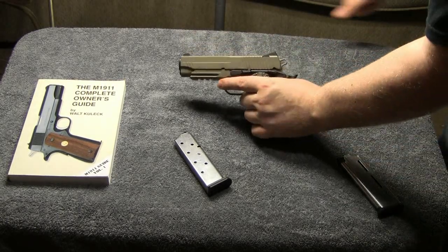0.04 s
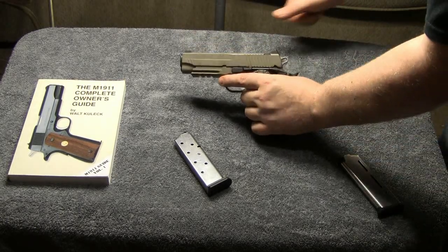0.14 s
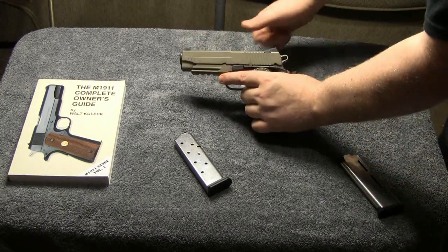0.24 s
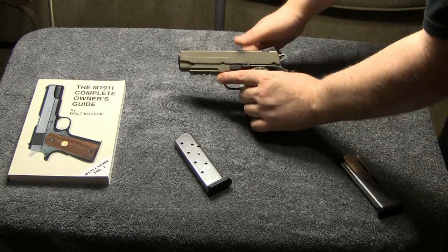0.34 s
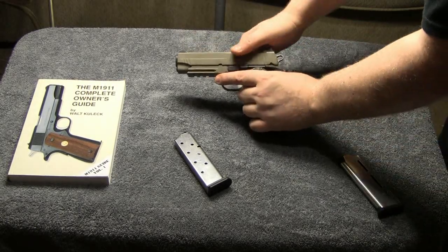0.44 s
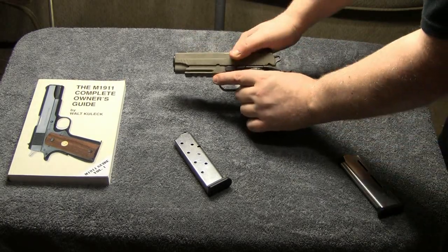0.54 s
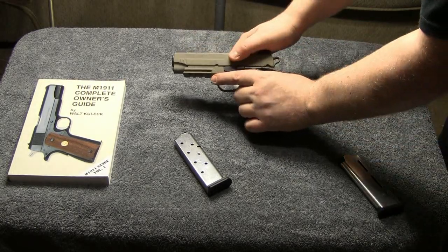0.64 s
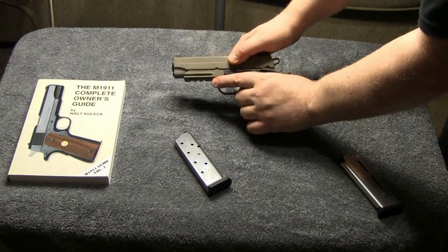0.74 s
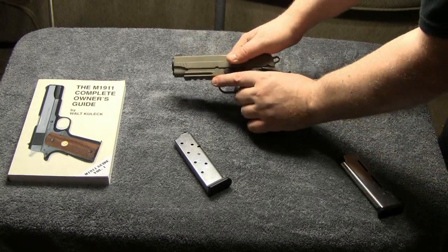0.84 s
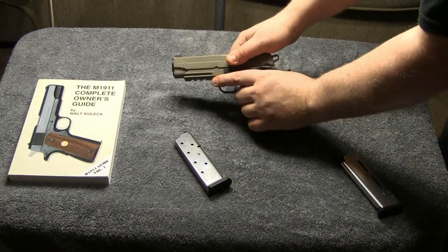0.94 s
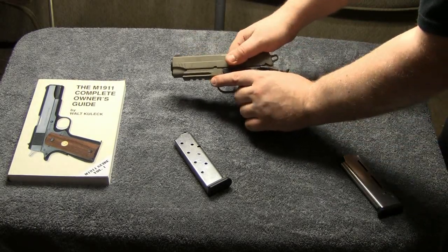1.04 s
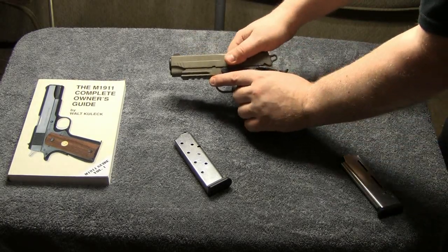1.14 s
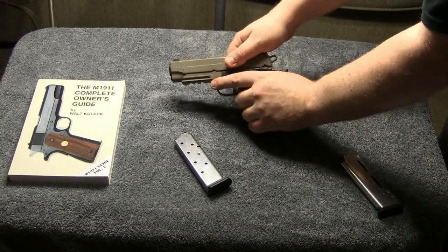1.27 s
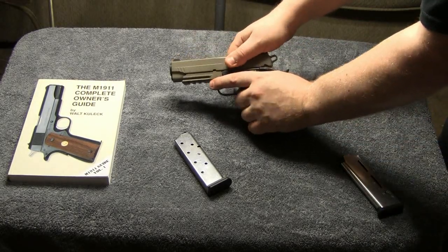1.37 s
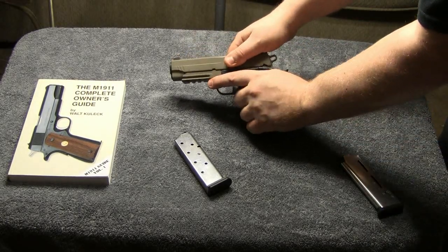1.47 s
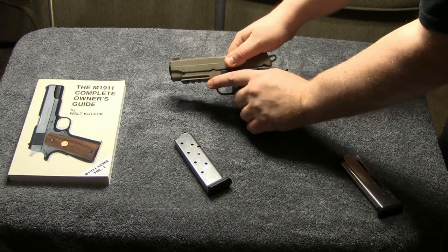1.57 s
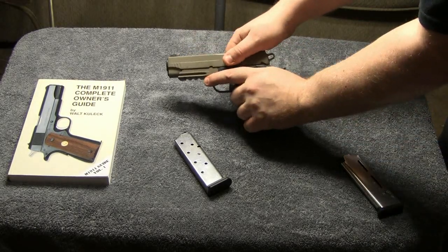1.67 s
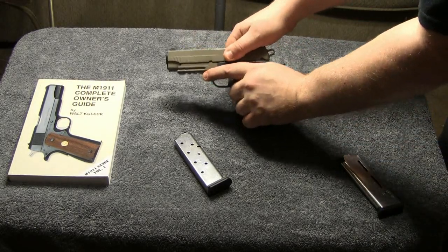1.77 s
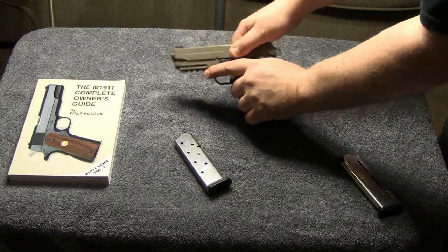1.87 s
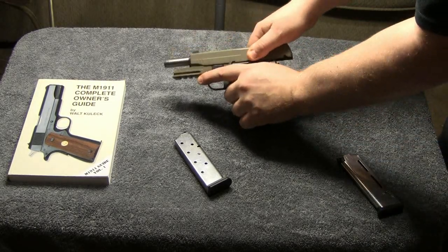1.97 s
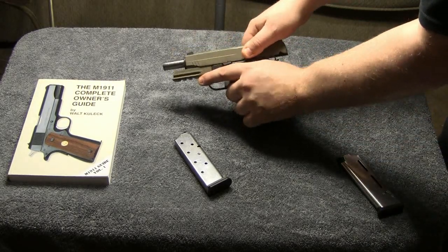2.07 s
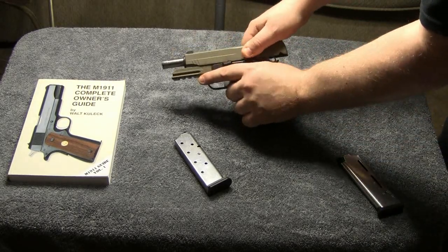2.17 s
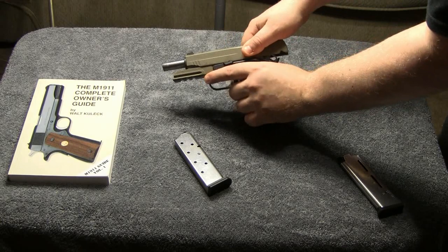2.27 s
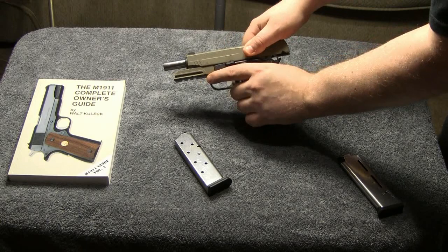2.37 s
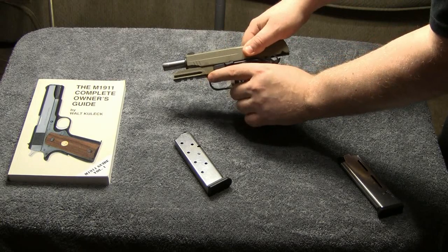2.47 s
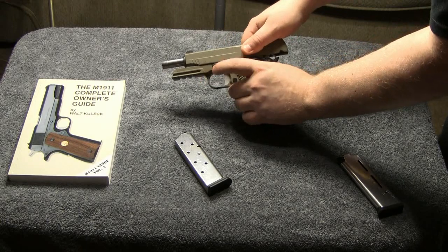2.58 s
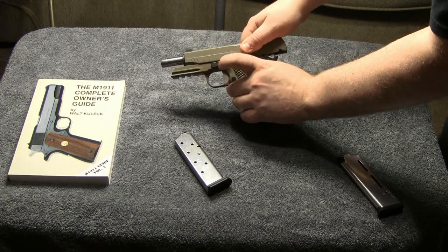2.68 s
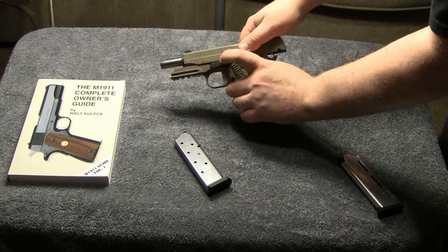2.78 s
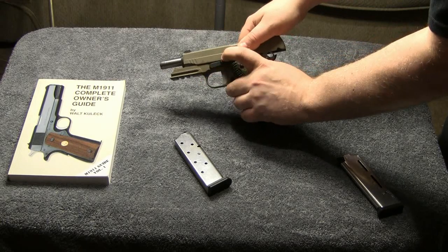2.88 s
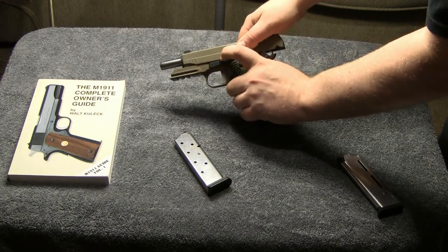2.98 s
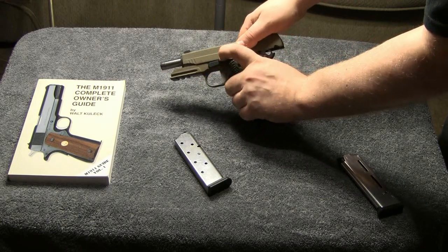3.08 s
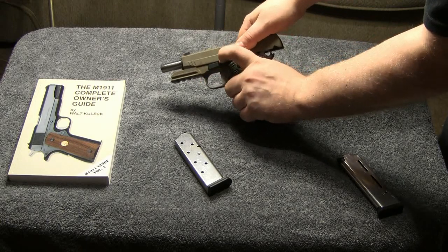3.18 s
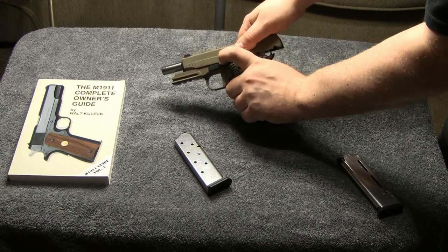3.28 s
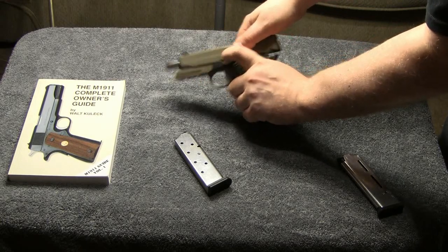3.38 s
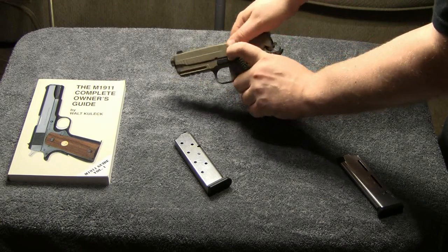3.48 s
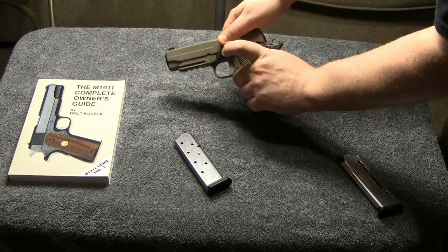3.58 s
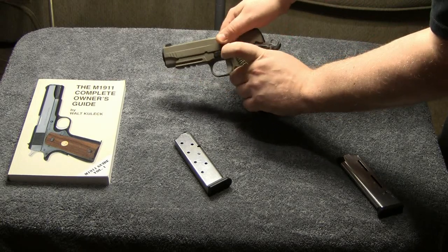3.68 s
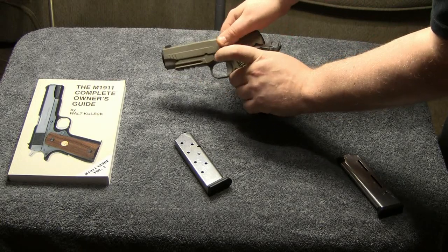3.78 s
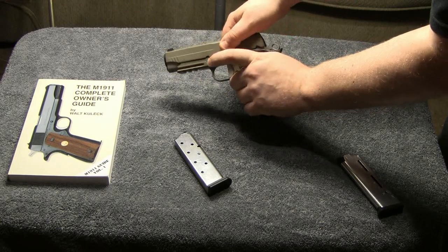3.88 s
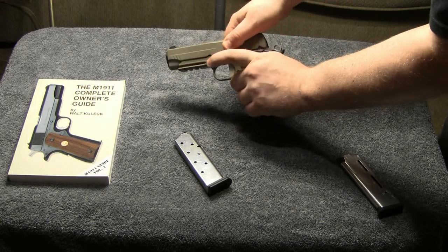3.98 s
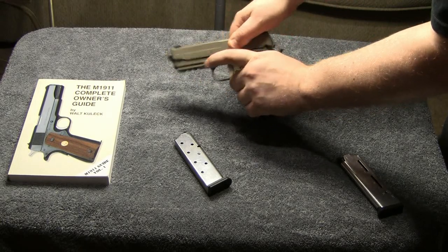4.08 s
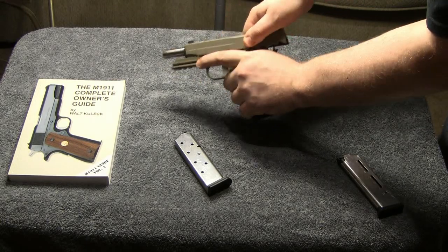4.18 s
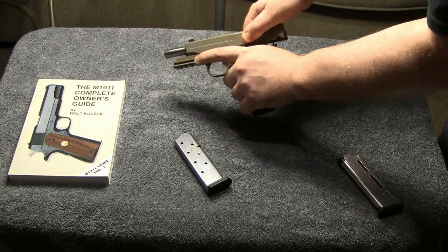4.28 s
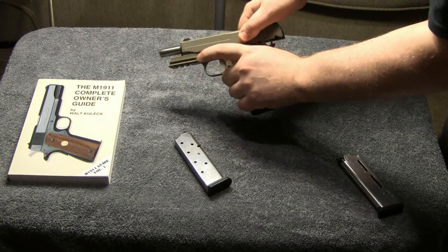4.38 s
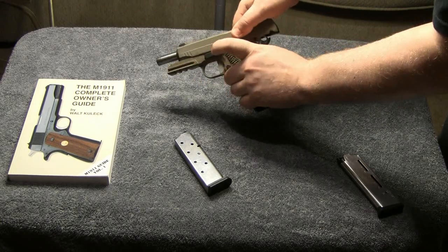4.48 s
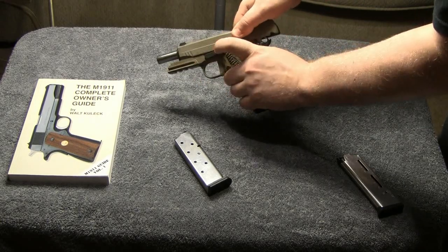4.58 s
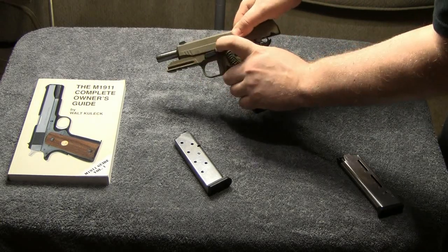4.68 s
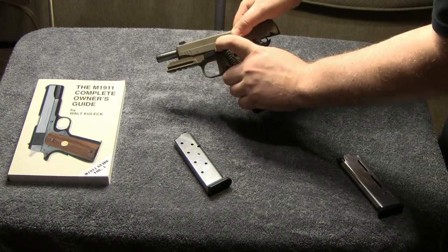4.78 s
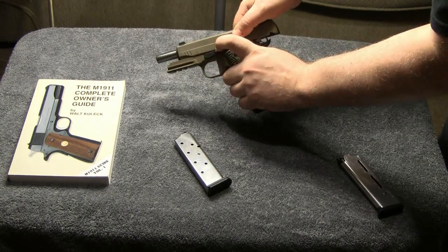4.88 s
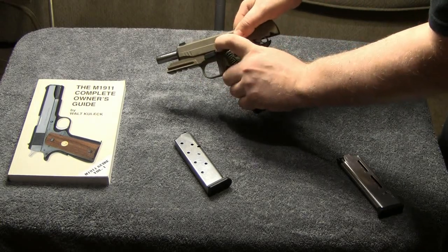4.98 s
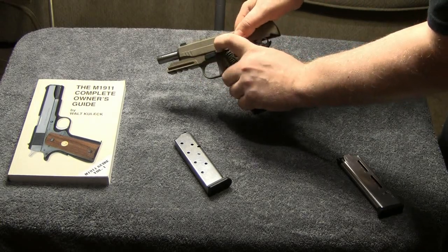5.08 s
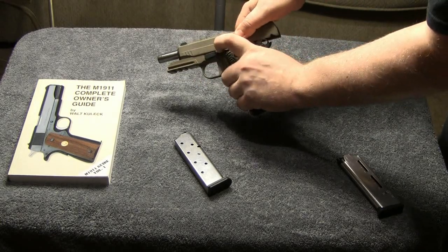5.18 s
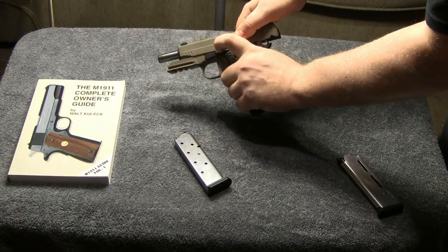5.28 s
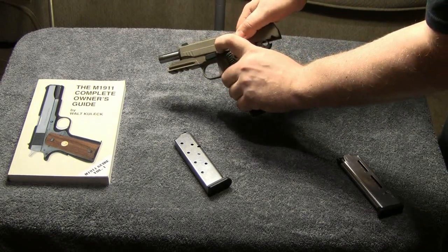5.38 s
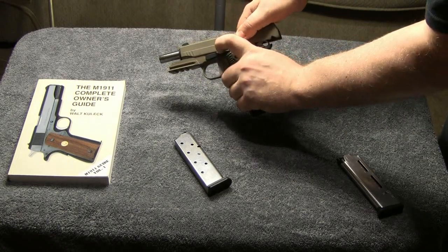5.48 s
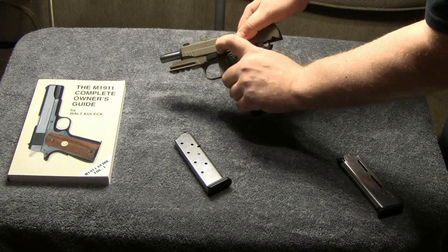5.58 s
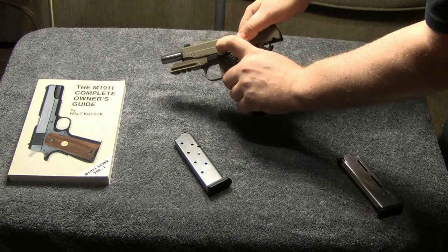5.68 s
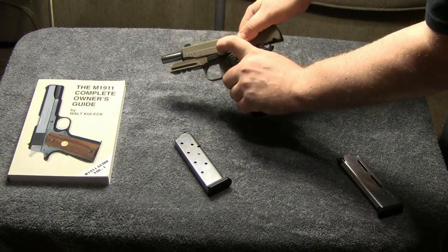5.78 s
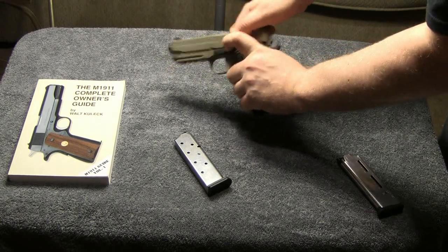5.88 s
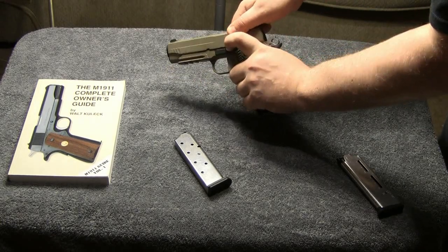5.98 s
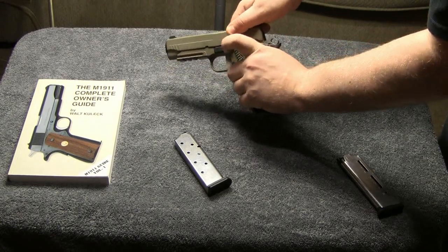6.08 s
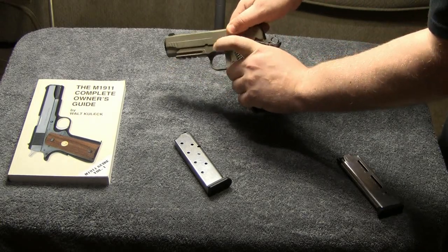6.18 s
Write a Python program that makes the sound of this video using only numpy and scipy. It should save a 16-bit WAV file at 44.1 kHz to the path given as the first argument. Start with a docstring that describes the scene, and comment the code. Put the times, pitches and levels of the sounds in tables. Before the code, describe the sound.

A pistol's slide is pulled back and run forward twice by hand, with sharp steel clacks and brief scrapes in a small room.

```python
"""Sharp steel clacks in a small room: a pistol is worked by hand over a cloth-covered table, its slide
pulled back, locked, then run forward and home. Each contact is a short dense crack with a faint ring;
the rails scrape between contacts and hands rustle on the grip. The room answers briefly over a low
hum and hiss, and a limiter catches the hardest blows."""
import sys
import numpy as np
from scipy import signal
from scipy.fft import rfft, irfft, next_fast_len
from scipy.io import wavfile
from scipy.ndimage import uniform_filter1d, minimum_filter1d, map_coordinates

SR = 44100
rng = np.random.default_rng(int(sys.argv[2]) if len(sys.argv) > 2 else 0)


def transcribe(u):
    """Save the signal u as a 16-bit wav file named by the first command-line argument.

    u: samples, shape (n,) or (channels, n), limited to [-1, 1]; the rate is SR.
    q: integer samples, one column per channel.
    """
    v = np.clip(np.atleast_2d(u).T, -1, 1)
    q = np.round(v * 32767).astype(np.int16)
    wavfile.write(sys.argv[1], SR, q)


N = 275007

# Stereo image of the room and the hands. Each row: frequency in Hz, left-right correlation.
ROOM_CORRELATION = [(300, 0.93), (1200, 0.98), (3500, 0.89), (6000, 0.33), (9000, 0.091)]


def amp(db):
    return 10 ** (np.asarray(db) / 20)


def unit(x):
    return x / np.sqrt(np.mean(x ** 2) + 1e-20)


def along(points, hz):
    """Read a curve of (Hz, value) points on a log frequency axis."""
    point_hz, values = np.transpose(points)
    return np.interp(np.log(hz + 1), np.log(point_hz + 1), values)


def bump(hz, centre_hz, width_hz, db):
    """Gain of one resonance standing db above its surroundings."""
    return amp(db / (1 + (2 * (hz - centre_hz) / width_hz) ** 2))


def wobble(rate):
    """A smooth random curve, rate knots a second."""
    return map_coordinates(rng.standard_normal(int(N * rate / SR) + 4), [np.arange(N) * rate / SR])


def filtered(x, response):
    """Shape x by a response over frequency."""
    n = x.shape[-1]
    m = next_fast_len(n + 8192)
    return irfft(rfft(x, m) * response(np.fft.rfftfreq(m, 1 / SR)), m)[..., :n]


def resonate(x, gain):
    """Pass x through the causal filter that has this gain over frequency."""
    m = 2 * next_fast_len(len(x))
    cepstrum = irfft(np.log(gain(np.fft.rfftfreq(m, 1 / SR)) + 1e-9), m)
    cepstrum[1:m // 2] *= 2
    cepstrum[m // 2 + 1:] = 0
    return irfft(rfft(x, m) * np.exp(rfft(cepstrum)), m)[:len(x)]


def noise(spectrum, size):
    """Coloured noise of rms 1."""
    return unit(filtered(rng.standard_normal(size), lambda hz: amp(along(spectrum, hz))))


def stereo_noise(spectrum, correlation, size):
    """Coloured noise whose stereo width changes with frequency."""
    def mid_side_gains(hz):
        angle = np.arccos(np.clip(along(correlation, hz), -1, 1)) / 2
        return np.array([np.cos(angle), np.sin(angle)])

    mid, side = filtered(noise(spectrum, (2, size)), mid_side_gains)
    return unit(np.array([mid + side, mid - side]))


def add(track, s, sound):
    """Mix a sound into the track from time s."""
    part = track[..., max(round(s * SR), 0):][..., :sound.shape[-1]]
    part += sound[..., :part.shape[-1]]


def room_air(t, start_db=-52.5, sink_db_per_s=0.4353):
    """Slowly sinking air and hiss, with faint whistles on top."""
    # Colour of the air. Each row: frequency in Hz, spectral density in dB.
    colour = [(20, -33.5), (60, -19), (130, -15), (200, -10.5), (250, -7), (340, -6), (550, -8),
              (1000, -11.5), (2400, -22), (5000, -31.5), (7500, -32), (9000, -29.5), (14300, -38.5),
              (16000, -59.5)]
    # Its stereo image. Each row: frequency in Hz, left-right correlation.
    correlation = [(60, 0.32), (150, 0.58), (380, -0.44), (950, -0.57), (2380, -0.025), (5980, 0.12),
                   (15000, -0.86)]
    # Narrow bands in the hiss. Each row: centre in Hz, width in Hz, boost in dB.
    whistles = [(6300, 260, 8), (7630, 430, 6), (8000, 250, 5.5)]
    air = stereo_noise(colour, correlation, N)
    air = filtered(air, lambda hz: np.prod([bump(hz, *band) for band in whistles], axis=0))
    return amp(start_db - sink_db_per_s * t) * air


def hum_and_fan(t, hum_hz=100, rest_db=-73, swell_db=10.5, fade_s=.07, sink_db_per_s=.5,
                fan_hz=238, fan_db=-67, fan_follows=.25):
    """A low hum swells and falls back; a wavering fan tone gently follows its level."""
    # Swells of the hum. Each row: start in seconds, end in seconds.
    swells = [(-0.05, .36), (.79, 1.44), (1.72, 1.96)]
    swell = sum(np.clip(.5 + np.minimum(t - start, end - t) / fade_s, 0, 1) for start, end in swells)
    hum_db = rest_db - sink_db_per_s * t + swell_db * swell
    hum = amp(hum_db + .5 * wobble(10)) * unit(np.sin(2 * np.pi * hum_hz * t + .4 * wobble(12)))
    fan = [amp(2.5 * wobble(6)) * np.sin(2 * np.pi * fan_hz * t + wobble(12)) for _ in range(2)]
    return hum + amp(fan_db + fan_follows * (hum_db - hum_db.mean())) * unit(np.array(fan))


def in_room(sound, room_db=-7, gap_s=0.0037, build_s=.002, early_db=2, early_t60=0.16):
    """The direct sound, then strong near walls and a short diffuse tail."""
    # Colour of the reverb. Each row: frequency in Hz, level in dB.
    colour = [(100, -12), (600, 3.5), (1500, 1.5), (3000, 2.5), (6000, -1.5), (10500, 1.5), (13000, 4),
              (16000, -0.5)]
    # Decay of the room. Each row: frequency in Hz, T60 in seconds.
    decay = [(150, 0.64), (600, 0.27), (1500, 0.4), (3500, 0.27), (7000, 0.32), (10000, 0.23),
             (15000, 0.068)]
    hz, t, spectra = signal.stft(stereo_noise(colour, ROOM_CORRELATION, SR // 3), SR, nperseg=256)
    tail = signal.istft(spectra * amp(-60 * t / along(decay, hz)[:, None]), SR, nperseg=256)[1]
    t = np.arange(tail.shape[1]) / SR
    tail *= 1 - np.exp(-np.maximum(t - gap_s, 0) / build_s)
    tail *= np.hypot(1, amp(early_db - 60 * t / early_t60))  # near walls
    response = amp(room_db) * tail / np.linalg.norm(tail[0])
    response[:, 0] += 1  # direct sound
    return signal.fftconvolve(sound[None], response, axes=1)


def hands(t, grain_db=0.5, hollow_hz=650, hollow_width_hz=90, hollow_db=10):
    """Soft swells of skin sliding over the hollow grip."""
    # Shifts of the hands. Each row: centre in seconds, length in seconds, level in dB.
    rubs = [(0.28, 0.44, -66), (0.656, 0.54, -63.5), (1.597, 0.032, -53.5), (5.077, 0.062, -56),
            (5.202, 0.12, -56.5), (5.601, 0.43, -61)]
    # Colour of rubbing skin. Each row: frequency in Hz, spectral density in dB.
    skin = [(30, -35), (200, -1), (500, -8.5), (660, -7), (850, -3.5), (1500, -9), (2500, -10),
            (5000, -21.5), (10000, -43), (16000, -41.5)]
    swell = sum(amp(db) * np.exp(-(2 * (t - s) / length) ** 2) for s, length, db in rubs)
    rub = amp(grain_db * wobble(90)) * stereo_noise(skin, ROOM_CORRELATION, N)
    return swell * unit(filtered(rub, lambda hz: bump(hz, hollow_hz, hollow_width_hz, hollow_db)))


def thumps(push_s=0.00051, low_cut_hz=45):
    """The slide ends its travel and jolts the whole gun: one short low push of air."""
    # Each row: start in seconds, level in dB.
    jolts = [(2.012, -48), (4.245, -43), (5.976, -38)]
    track = np.zeros(N)
    age = np.arange(SR // 20) / SR / push_s
    for s, db in jolts:
        add(track, s, amp(db) * age * np.exp(1 - age))
    return filtered(track, lambda hz: hz ** 2 / (hz ** 2 + low_cut_hz ** 2))


def scrapes(grit_db=3.0, edge_s=0.0022, shelf_hz=4800):
    """The slide catches and slips on its rails and spring in tiny grains, duller running forward."""
    # Slide strokes. Each row: start in seconds, end in seconds, level in dB, treble shelf in dB.
    strokes = [(1.953, 2.016, -35.5, 0.5), (2.061, 2.132, -47.5, -8), (3.446, 3.476, -32.5, -4.5),
               (3.574, 3.592, -46, -7.5), (4.156, 4.208, -31, -2), (5.114, 5.143, -64, 5),
               (5.927, 5.98, -36, -2)]
    # Colour of the rails. Each row: frequency in Hz, spectral density in dB.
    rails = [(200, -24), (600, -3.5), (1400, -12.5), (3300, 0), (5200, -1.5), (7000, 4), (8500, -3),
             (10500, -1.5), (12500, -13), (16000, -28)]
    t = np.arange(SR // 12) / SR
    for start, end, level_db, treble_db in strokes:
        grit = amp(grit_db * unit(uniform_filter1d(rng.standard_normal(len(t)), size=50)))
        gate = np.clip(np.minimum(t, end - start - t) / edge_s, 0, 1)
        shelf = lambda hz: amp(treble_db * hz ** 4 / (hz ** 4 + shelf_hz ** 4))
        rasp = filtered(noise(rails, len(t)), shelf)
        yield start, amp(level_db) * gate * unit(grit * rasp)


def barrel_rings(t60=.21):
    """The bared barrel rings thinly when the slide hits its rear stop."""
    # Barrel modes. Each row: frequency in Hz, relative level in dB.
    modes = [(2440, 2.5), (5330, -7), (6480, -4.5), (7410, -5.5)]
    # Hits on the rear stop. Each row: start in seconds, level in dB.
    rear_stops = [(2.0136, -42.5), (4.2438, -40.5)]
    t = np.arange(SR // 3) / SR
    ring = sum(amp(db - 60 * t / t60) * np.sin(2 * np.pi * hz * t) for hz, db in modes)
    return [(s, amp(level_db) * ring) for s, level_db in rear_stops]


def burst(t60, chatter_db, attack_s=0.00014, chatter_t60=0.069, evenness=0.73):
    """A broadband snap that dies within milliseconds while loose parts chatter on; rms 1 at its head."""
    t = np.arange(SR // 8) / SR
    fall = np.hypot(amp(-60 * t / t60), amp(chatter_db - 60 * t / chatter_t60))
    spectrum = rfft(rng.standard_normal(len(t)) * fall, next_fast_len(2 * len(t)))
    spectrum /= (np.abs(spectrum) + 1e-9) ** evenness  # crowded steel modes leave no deep gaps
    snap = irfft(spectrum)[:len(t)] * (1 - np.exp(-t / attack_s))
    return snap / snap[t < .004].std()


def clack(level_db, knock_db, ping_db, t60, frame_hz, slide_hz, slide_db,
          frame_db=8, frame_width=0.35, slide_width=0.25, chatter_db=-22):
    """One contact: a crack through resonances that shift with the slide's position, and a faint ring."""
    # Colour of the crack. Each row: frequency in Hz, spectral density in dB.
    crack_colour = [(40, -33), (200, -27.5), (380, -10), (560, 0), (1300, -1), (1800, -1.5), (3300, 1.5),
                    (4400, 1.5), (5400, 0), (6800, 4), (8300, 0.5), (9800, 6.5), (11300, -0.5), (13000, -7),
                    (16000, -24)]
    # Modes of slide and frame. Each row: frequency in Hz, relative level in dB, T60 in seconds.
    steel_modes = [(630, -2, .14), (707, -5, .12), (877, -1, .14), (1370, -6, .11), (1490, -7, .12),
                   (2415, -7, .14), (2644, -5, .14), (3420, -3, .12), (3505, -3, .14), (4209, -3, .13),
                   (4769, -5, .12), (5320, -7, .13), (6060, -6, .15), (6450, -7, .13), (7420, -6, .13),
                   (7858, -7, .14), (9420, -3, .15), (9620, -3, .14), (11087, -8, .14)]
    knock_below_hz, ping_above_hz = 1800, 6500
    register = lambda hz: np.searchsorted([knock_below_hz, ping_above_hz], hz)
    gains = amp(level_db + np.array([knock_db, 0, ping_db]))  # heavy contacts knock, sharp edges ping

    def body(hz):
        """Resonant colour, each register at its own strength; a soft contact also loses its top."""
        frame = bump(hz, frame_hz, frame_width * frame_hz, frame_db)
        slide = bump(hz, slide_hz, slide_width * slide_hz, slide_db)
        colour = amp(along(crack_colour, hz)) * frame * slide
        register_rms = np.sqrt(np.bincount(register(hz), colour ** 2) / len(hz))
        softness = amp(min(ping_db, 0) * np.maximum(hz / 10000 - 1, 0))
        return colour * softness * uniform_filter1d((gains / register_rms)[register(hz)], size=200)

    crack = resonate(burst(t60, chatter_db), body)
    t = np.arange(len(crack)) / SR
    hz, mode_db, mode_t60 = np.transpose(steel_modes)
    ring_db = rng.normal(-17.5, 2.5, len(hz))
    strength = gains[register(hz)] * amp(ring_db + mode_db) * rng.choice([-1, 1], len(hz))
    partials = np.sin(2 * np.pi * hz[:, None] * t) * amp(-60 * t / mode_t60[:, None])
    return crack + strength @ partials


def ticks(t60=.013, frame_hz=1020, full_knock_db=-31, knock_growth=.45):
    """Loose parts click lightly under the fingers; the faintest clicks are mostly dull knock."""
    # Each row: start in seconds, level in dB, relative treble in dB, slide resonance in Hz.
    contacts = [(1.4375, -43.5, -3.5, 4250), (1.5912, -52.5, -8.5, 2670), (1.7234, -50.5, -16, 3400),
                (1.8102, -57, -6, 3400), (1.94, -47, -0.5, 3950), (2.1125, -34, -10.5, 2800),
                (3.069, -47.5, -9, 2750), (3.5781, -40.5, -4, 4520), (3.8526, -55.5, -16.5, 2900),
                (3.9348, -52, -6.5, 3240), (3.9911, -49.5, -6.5, 3200), (4.0463, -55.5, -13, 3500),
                (4.1482, -32.5, -11, 4540), (5.049, -53, -17, 2640), (6.1045, -39.5, -8, 3300),
                (6.1346, -40, -5, 3050), (6.2171, -45, -12, 2970)]
    for s, level_db, ping_db, slide_hz in contacts:
        knock_db = full_knock_db + knock_growth * level_db - level_db  # grows more slowly than the tick
        yield s, clack(level_db, knock_db, ping_db, t60, frame_hz, slide_hz, slide_db=14,
                       frame_db=12, frame_width=0.59, slide_width=0.3, chatter_db=-30.5)


def snaps(ping_db=3, full_t60=0.0074, full_db=-16, halving_db=6):
    """Parts snap brightly edge over edge as the slide is forced along: the stronger, the shorter."""
    # Each row: start in seconds, level in dB, relative knock in dB, frame and slide resonances in Hz.
    contacts = [(1.9576, -24.5, -15, 1400, 4750), (1.9649, -29, -14.5, 1170, 3650),
                (1.986, -19, -15, 610, 3550), (2.013, -17.5, -18.5, 610, 3430),
                (3.4491, -25, -8.5, 600, 3500), (4.1572, -18.5, -9.5, 787, 5870),
                (4.1817, -22, -10.5, 620, 4160), (4.245, -18, -14.5, 690, 4170),
                (5.9303, -26, -6, 664, 3020)]
    for s, level_db, knock_db, frame_hz, slide_hz in contacts:
        t60 = full_t60 * 2 ** ((full_db - level_db) / halving_db)
        yield s, clack(level_db, knock_db, ping_db, t60, frame_hz, slide_hz, slide_db=7.5)


def landings(neutral_t60=.013, halving_db=7):
    """The slide or barrel clacks heavily against a stop: the harder, the shorter."""
    # Each row: start in seconds, level in dB, hardness as relative treble in dB, relative knock in dB,
    # frame and slide resonances in Hz.
    contacts = [(2.0212, -19, -8, -10, 1360, 2866), (2.1308, -29, -11, -11, 1030, 4150),
                (2.1366, -18, -4.5, -6, 1290, 3460), (3.4985, -39, -7, -11, 1530, 3690),
                (3.5928, -17.5, 3, -10, 1310, 4750), (3.6024, -19, -1, -7, 893, 3130),
                (4.3692, -42.5, -5, -10, 1310, 3800), (4.3741, -37.5, -12.5, -9, 670, 3030),
                (5.9758, -16.5, 3.5, -12.5, 1370, 4230)]
    for s, level_db, hardness_db, knock_db, frame_hz, slide_hz in contacts:
        t60 = neutral_t60 * 2 ** (-hardness_db / halving_db)
        yield s, clack(level_db, knock_db, hardness_db, t60, frame_hz, slide_hz, slide_db=4.5,
                       frame_db=10.5, frame_width=0.39)


def pistol(side_db=-15, tick_room_db=-9):
    """Contacts and strokes, each with its own room reflections, as if from a slightly different spot."""
    track = np.zeros((2, N))
    strokes = list(scrapes())
    for s, sound in [*snaps(), *landings(), *barrel_rings(), *strokes]:
        add(track, s, in_room(sound))
    for s, sound in ticks():
        add(track, s, in_room(sound, room_db=tick_room_db))
    # left and right differ in phase in the high treble
    side = filtered(track.mean(axis=0), lambda hz: 1j * amp(side_db) * np.minimum(hz / 10000, 1.3) ** 3)
    return track + np.array([side, -side])


def scene():
    """The pistol and the hands working it, over quiet room tone."""
    t = np.arange(N) / SR
    return pistol() + thumps() + hands(t) + room_air(t) + hum_and_fan(t)


def record(dry, ceiling=1.2, hold_s=0.0023, top_hz=16700):
    """A limiter ducks peaks above its ceiling, the rest clips at full scale, and the very top is cut."""
    hold = int(hold_s * SR)
    needed_gain = np.minimum(1, ceiling / (np.abs(dry).max(axis=0) + 1e-9))
    held_gain = minimum_filter1d(needed_gain, hold, origin=(hold - 1) // 2)
    limited = np.clip(dry * uniform_filter1d(held_gain, size=12), -1, 1)
    return filtered(limited, lambda hz: np.clip((top_hz - hz) / 700, 0, 1))


dry = scene()
out = record(dry)
transcribe(out)
```